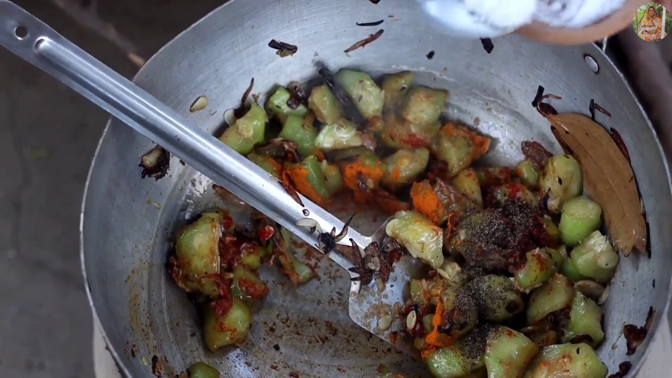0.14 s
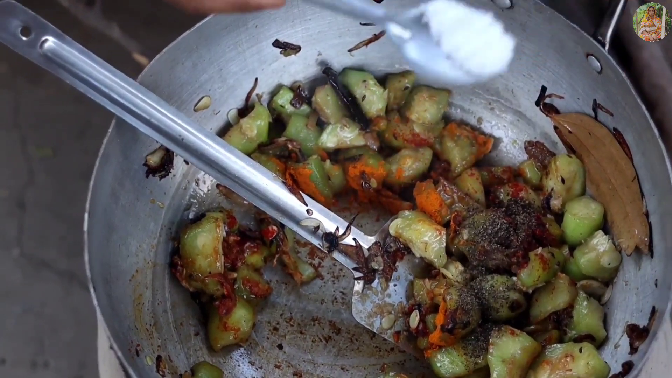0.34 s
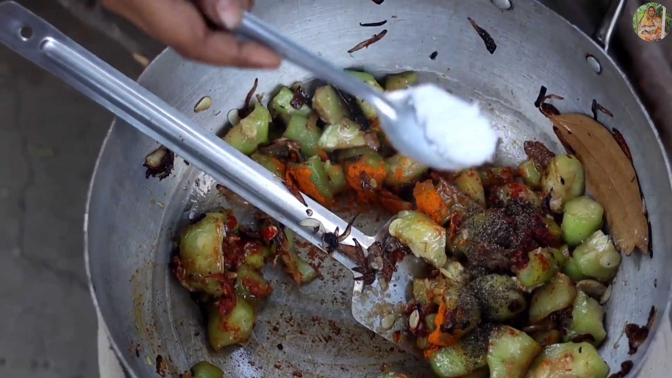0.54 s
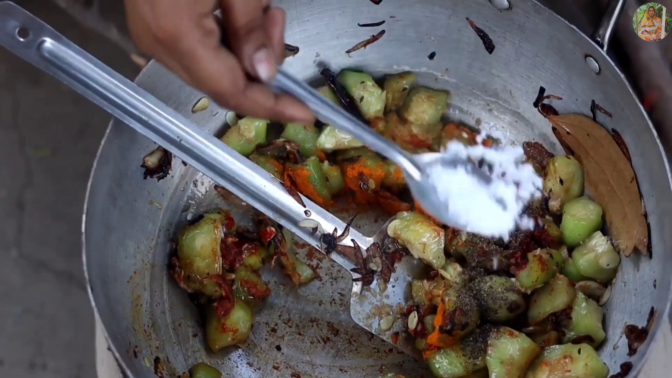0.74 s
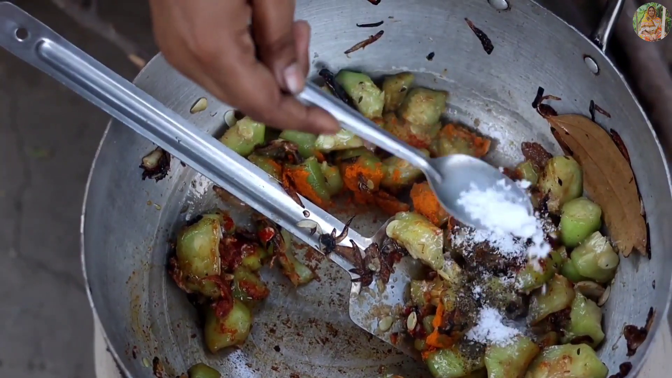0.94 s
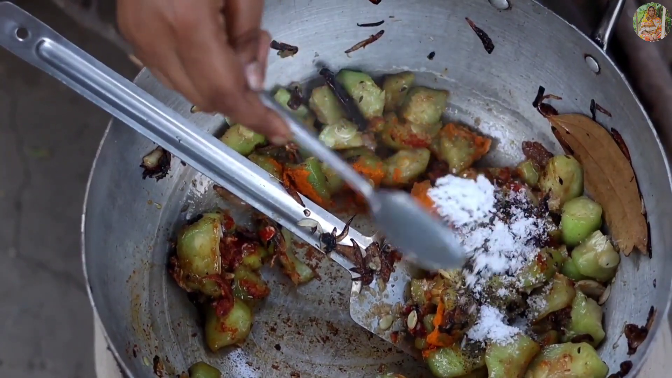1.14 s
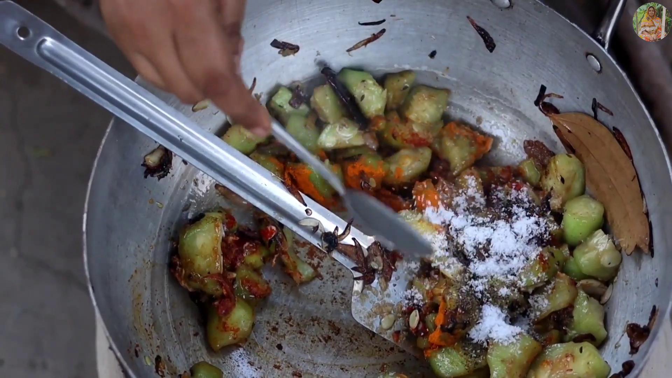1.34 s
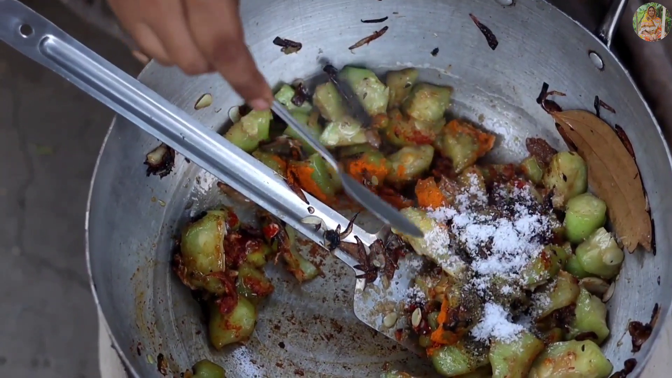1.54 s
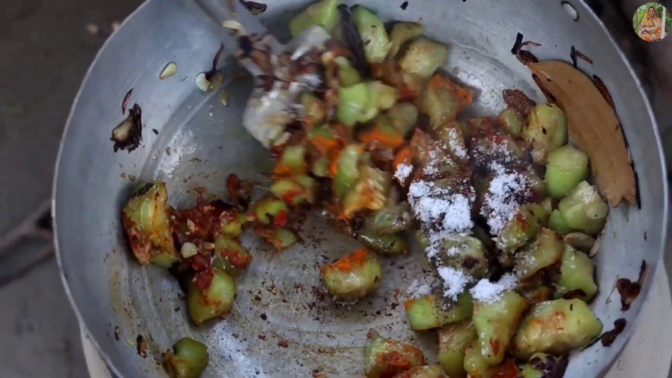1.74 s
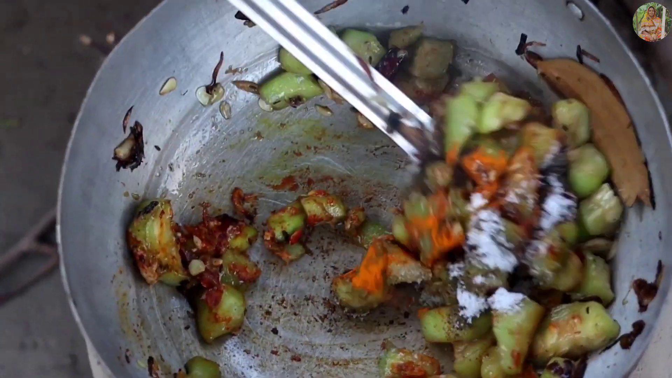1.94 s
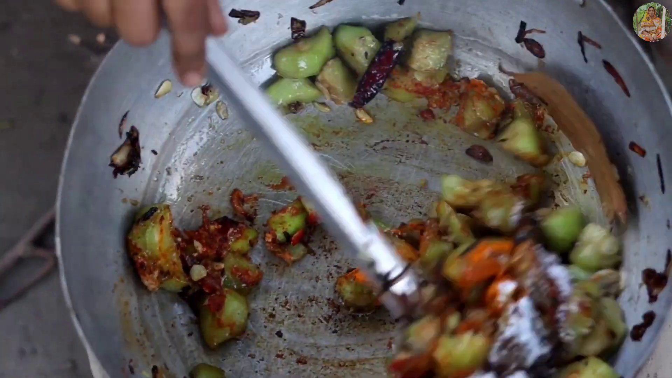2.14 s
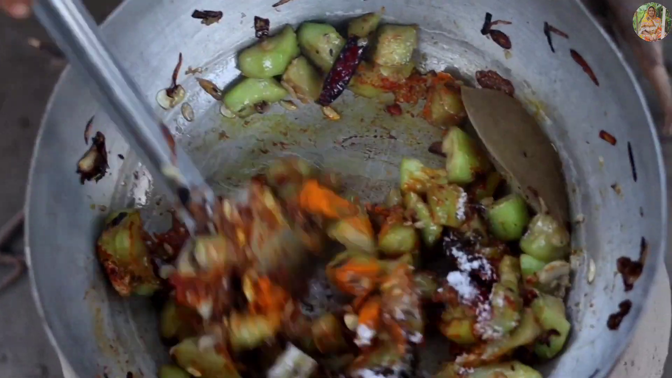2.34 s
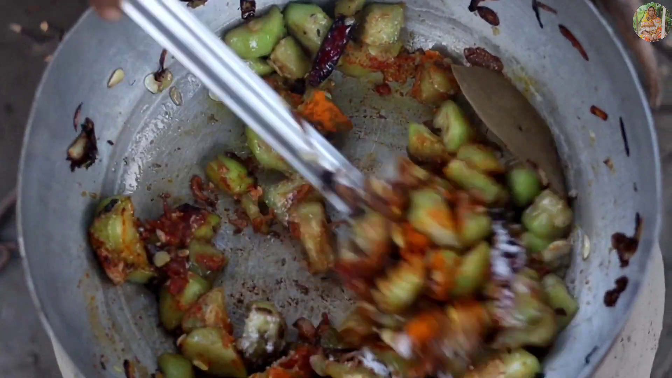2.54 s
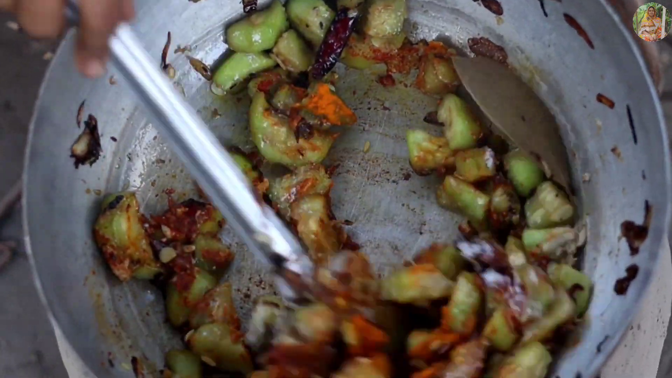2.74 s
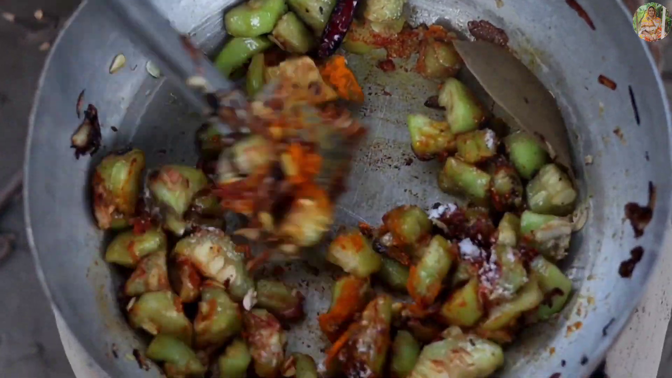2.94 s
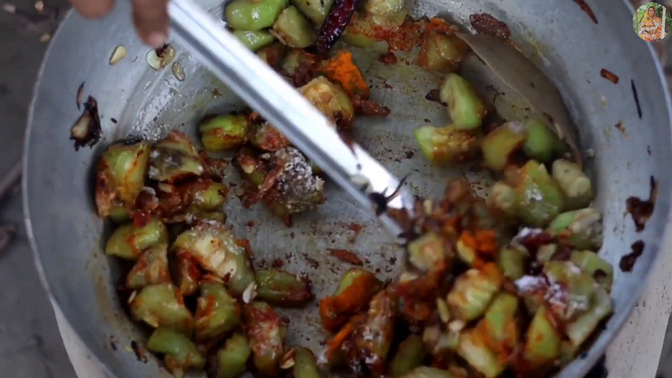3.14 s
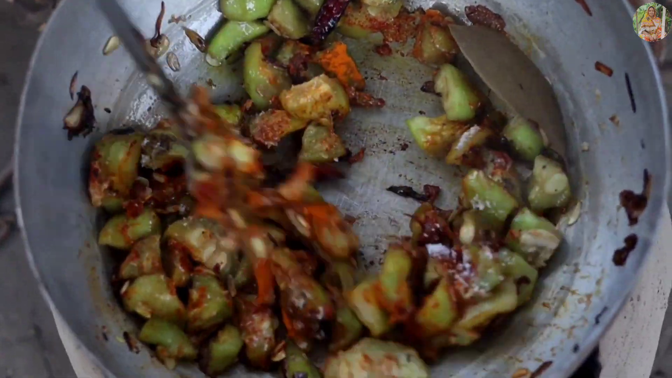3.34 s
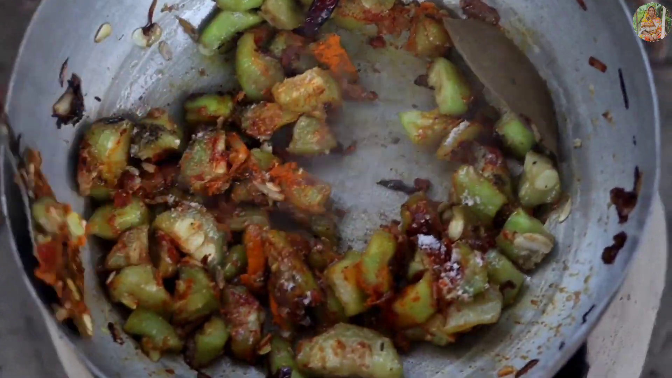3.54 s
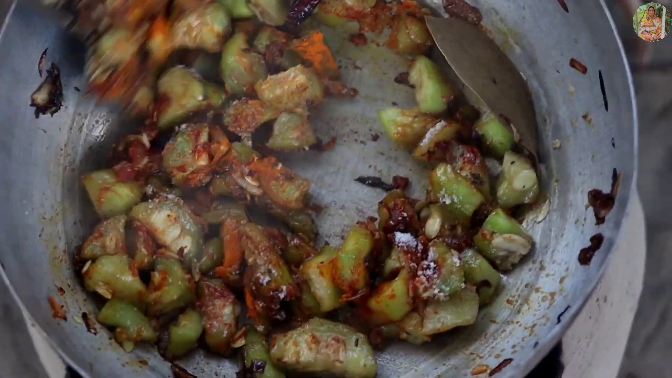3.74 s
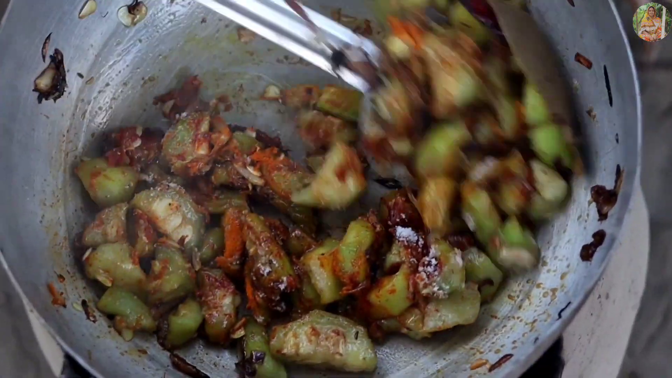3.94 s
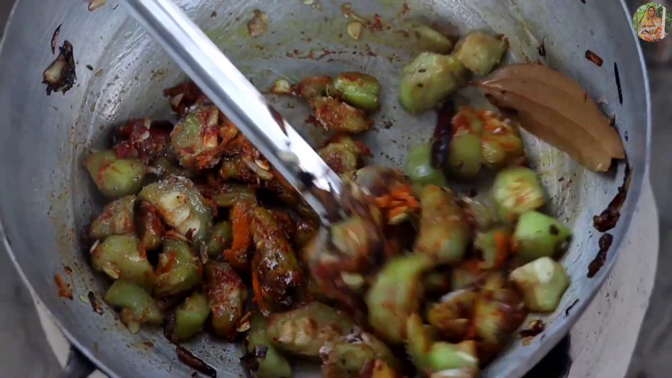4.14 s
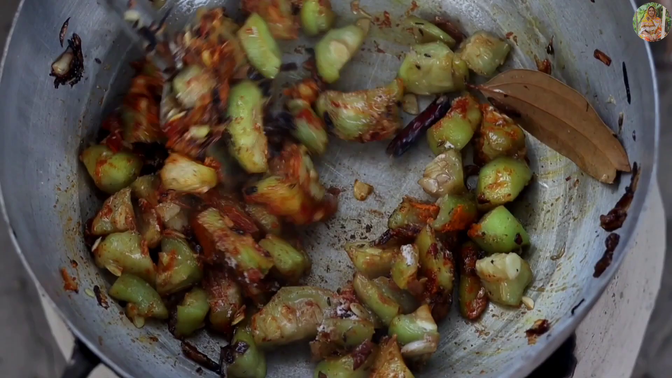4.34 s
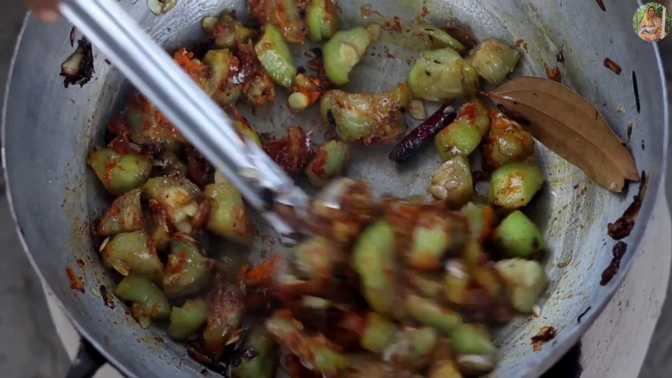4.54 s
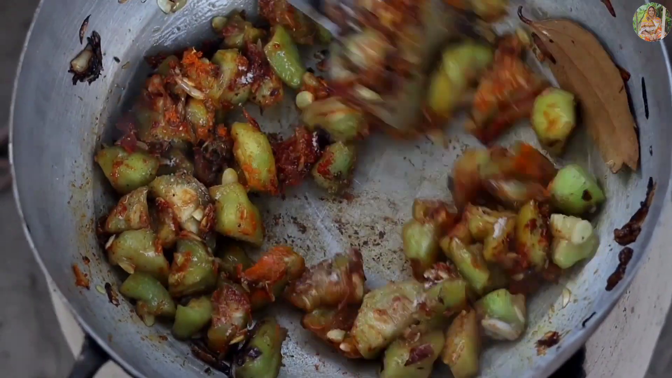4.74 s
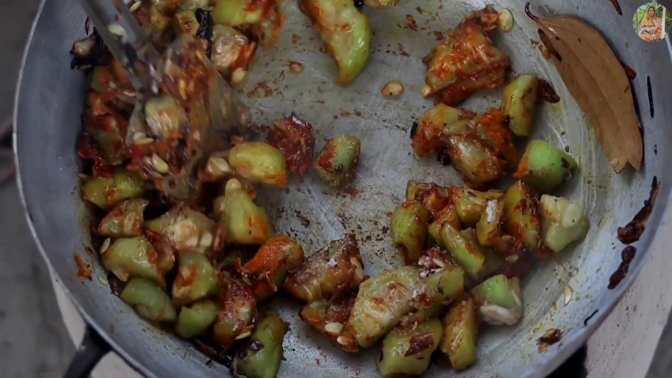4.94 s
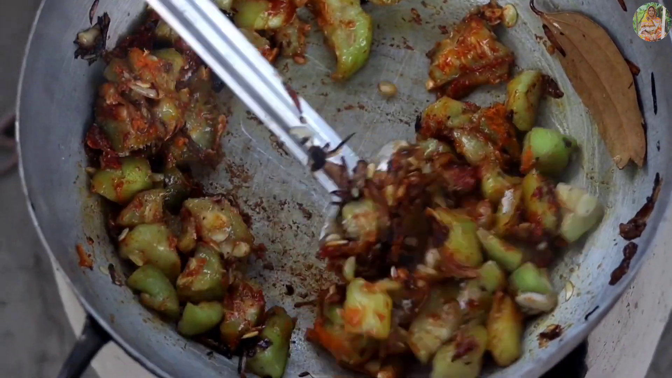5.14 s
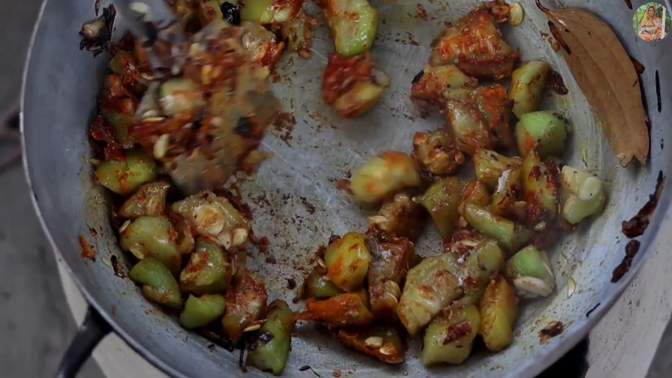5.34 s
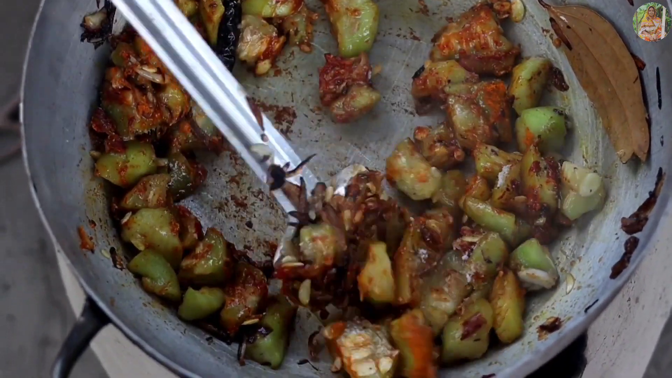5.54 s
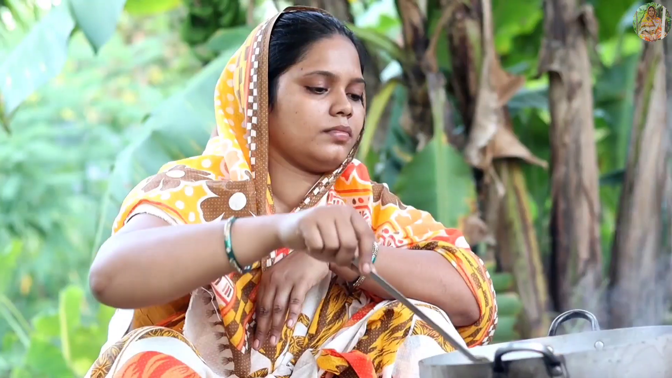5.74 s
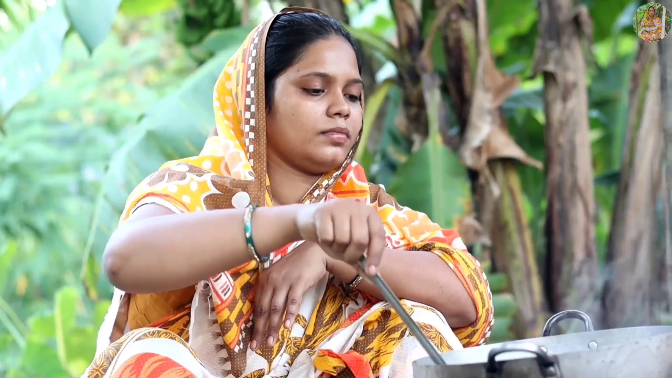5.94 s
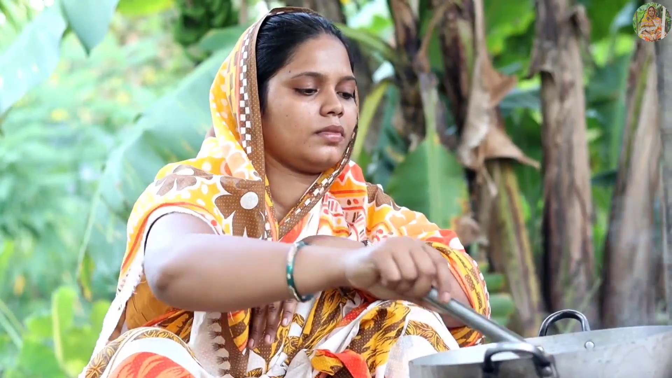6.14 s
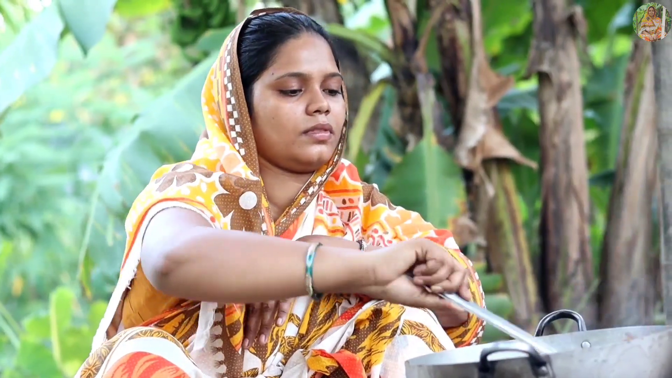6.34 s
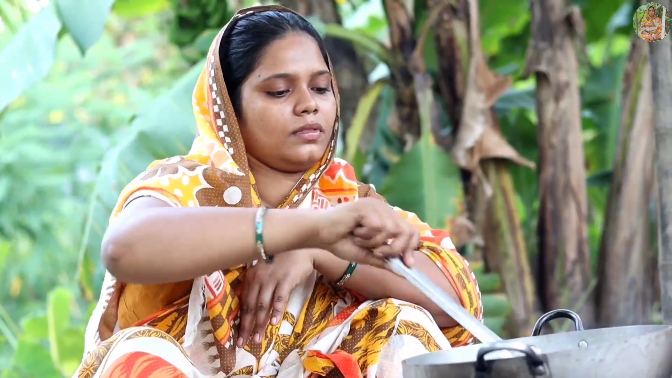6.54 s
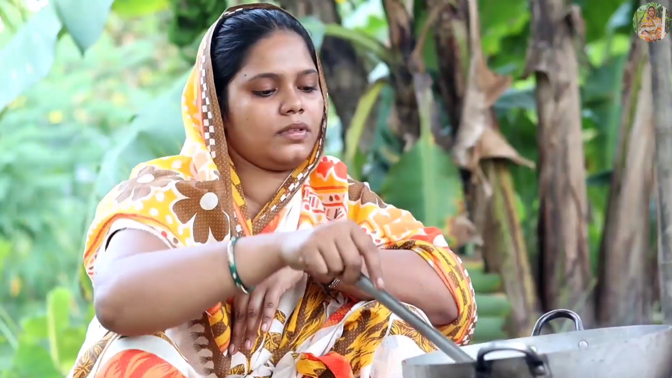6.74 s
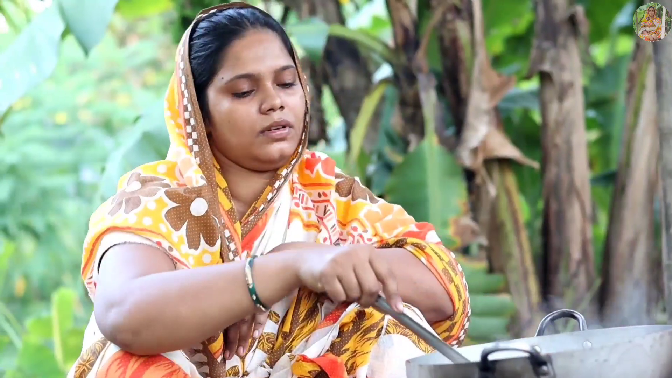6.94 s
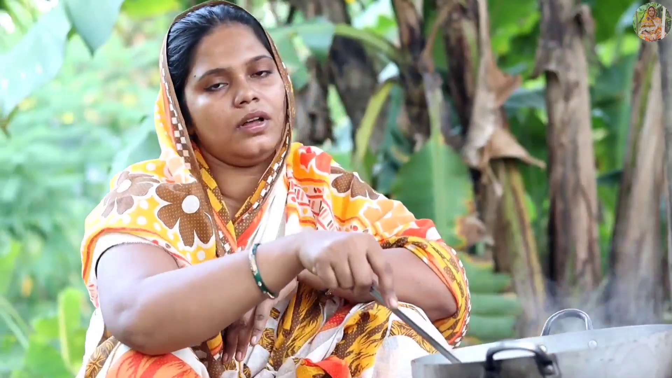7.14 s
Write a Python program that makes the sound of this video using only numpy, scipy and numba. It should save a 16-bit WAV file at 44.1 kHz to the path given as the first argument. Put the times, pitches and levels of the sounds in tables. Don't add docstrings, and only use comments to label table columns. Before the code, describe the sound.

Close to a wide metal pan outdoors, vegetables fry with an even, bright, crackling sizzle over a faint low engine drone. Before two seconds the hiss jumps louder and surges with each turn of a spatula, with dull knocks and one sharp scrape. Near the end the sound abruptly becomes distant: faint sizzle, no engine, and prominent metallic knocks and scrapes.

```python
import sys
import numpy as np
from scipy import signal
from scipy.fft import rfft, irfft, next_fast_len
from scipy.io import wavfile
from scipy.ndimage import uniform_filter1d
from numba import njit

SR = 44100
rng = np.random.default_rng(int(sys.argv[2]) if len(sys.argv) > 2 else 0)


def output_pcm(signal):
    pcm = np.clip(np.atleast_2d(signal).T, -1, 1) * 32767
    wavfile.write(sys.argv[1], SR, np.round(pcm).astype(np.int16))


def volts_from_db(level):
    exponent = np.asarray(level, float) / 20
    return 10 ** exponent


N = 316880

# (frequency [Hz], density [dB per Hz])
REST_SPECTRUM = [(120, -63), (200, -30), (471, -18), (618, -18.5), (974, -15.5), (1150, -10.5),
                 (1400, -10.5), (1590, -3.5), (1840, -12.5), (2210, -6), (4030, -10), (8350, -2.5),
                 (10600, -6), (13400, 4), (15500, 0)]
STIRRED_SPECTRUM = [(120, -50.5), (200, -26), (288, -21), (446, -8), (535, -13), (1190, -8.5), (1630, -5.5),
                    (1920, -13), (2760, -8), (4680, -3), (6620, -5), (8390, 4), (10600, -5.5), (13500, 2.5),
                    (15600, -7)]
DISTANT_SPECTRUM = [(120, -9), (200, -10.5), (463, -9.5), (691, -20), (799, -24), (860, -11), (942, -13),
                    (1070, -6.5), (1190, -17), (1430, -9), (1750, -10.5), (8870, 2), (15600, -14)]
# (frequency [Hz], width [Hz], gain [dB])
REST_BOWL = [(600, 900, 4.4), (440, 80, 2.5), (2100, 330, 1.4)]
STIRRED_BOWL = [(470, 37, -0.5), (1052, 28, 4), (1680, 120, 2.5), (1930, 98, 1), (2250, 290, 4),
                (2800, 780, 3.5)]
DISTANT_BOWL = [(447, 80, 4.7), (1040, 40, 4), (1420, 110, 6)]
# (low edge [Hz], high edge [Hz])
BUBBLE_BANDS = [(6500, 10500), (3000, 6500), (10500, 20000), (110, 1800), (1800, 3000)]
HZ = np.fft.rfftfreq(next_fast_len(N), 1 / SR)
BAND_SHARES = [1 / (1 + (lo / (HZ + 1)) ** 12) - 1 / (1 + (hi / (HZ + 1)) ** 12) for lo, hi in BUBBLE_BANDS]

# (loudest moment [s], swell [dB], length [s], wetness [dB])
TURNS = [(1.932, 3, 0.18, -1), (2.15, 0.5, 0.055, -3.5), (2.462, 5.5, 0.3, 1.5), (2.74, .5, 0.076, -2),
         (2.9, 1.5, .06, 1), (3.066, 5, 0.15, 0.5), (3.37, 2, 0.11, 0.5), (3.56, 5.5, 0.17, -0.5),
         (3.95, 3.5, .2, 0.5), (4.25, 1.5, 0.089, 1), (4.425, 6.5, 0.15, 0), (4.63, 6, 0.12, -1.5),
         (4.879, 6, 0.14, -1), (5.05, 4, 0.087, -0.5), (5.143, 2.5, 0.054, 1.5), (5.42, 3, 0.22, 0),
         (5.698, 2.5, 0.32, -0.5)]
# (level over spray [dB], slope with swell [dB/dB], slope with wetness [dB/dB])
STIRRED_MIX = [(-1.5, -0.06, 0.96), (-3.5, -.5, 0.4), (-10.5, -0.3541, 0.17), (-9.5, -0.09, 1.8)]
# (level over spray [dB], slope with growth [dB/dB])
RESTING_MIX = [(-1.5, -0.54), (-8.5, .1), (-10.5, -.5), (-9.5, -.5)]
# (level over spray [dB], slope with change [dB/dB])
DISTANT_MIX = [(0, 0.1), (-9.5, -1.1), (-6, -.6), (-7.5, -.5)]
STIRRED_DB, CUT_S, CUT_DB_PER_S = -30, 5.85, -400
RESTING_DB, SALT_S, SALT_DB_PER_S = -36.5, 0.75, 2.8
DISTANT_DB, WAKE_S, WAKE_DB, COOL_S, COOL_DB_PER_S = -44, 6.08, -19, 6.57, -4.5

# (frequency [Hz], level [dB], t60 [s])
LOW_MODES = [(253, -20.5, 0.16), (352, -21.5, 0.062), (395, -17, .04), (442, 6.5, 0.055),
             (512, -0.5, 0.072), (570, -3, 0.042), (670, -15, 0.079)]
MID_MODES = [(745, -5.5, 0.051), (873, -7, 0.094), (1026, -13, 0.2), (1053, -1, 0.055), (1330, -13, 0.25),
             (1500, -0.5, 0.062), (1597, -4.5, 0.049), (1774, -5.5, .08), (1956, -1, 0.065),
             (2224, -9, 0.04), (2530, -8, 0.06), (2830, -3, .04)]
# (frequency [Hz], level [dB], t60 [ms])
EDGE_MODES = [(3080, -14, 7), (4800, -4.5, 4.8), (5800, 1, 4.8), (7520, 4.5, 3.4), (9000, 3.5, 2.3),
              (12900, -6, 1.4)]
# (time [s], low peak [dB], middle over low [dB], rubbing time [s], middle pitch [Hz])
KNOCKS = [(1.95, -42, 13, 0.013, 1500), (2.698, -32, 2, 0.011, 1060), (3.204, -33, 6, .012, 1050),
          (3.633, -28, -22, .008, 556), (3.978, -40, 8, .012, 1110), (4.064, -33, -2, 0.015, 800),
          (4.486, -42, -1, .012, 1268), (4.893, -36.5, 11, 0.021, 795), (5.043, -28, 3, .03, 780),
          (5.06, -40, 11, 0.033, 1330), (5.08, -37.5, 18, 0.012, 1790), (5.999, -35.5, -7, 0.013, 2300),
          (6.058, -38.5, -11, .009, 1500), (6.218, -32, -3, 0.038, 1850), (6.314, -32.5, -8, 0.034, 800),
          (6.365, -16, -1.5, 0.011, 1500), (6.38, -22, -0.5, 0.027, 1030), (6.385, -29.5, 7, .029, 1550),
          (6.435, -34.5, -10, .012, 1900), (6.51, -43, -1, 0.023, 1450), (6.925, -21.5, -11.5, .0025, 1450),
          (6.94, -36.5, -10, 0.027, 700), (7.06, -46, -6, .019, 650)]
# (time [s], rasp peak [dB], middle over rasp [dB], rubbing time [s], middle pitch [Hz])
SCRAPES = [(5.126, -16.5, -6, 0.012, 1480), (5.145, -18, -22, 0.017, 2500),
           (5.988, -22.5, -20, 0.0095, 2230), (6.0, -20.5, -18, 0.013, 2300),
           (6.125, -27, -15, 0.011, 2000), (6.129, -31, -11, 0.11, 1500), (6.19, -33, 1, 0.016, 2050),
           (6.2, -18.5, -15, 0.017, 2050), (6.21, -24, -11, 0.053, 1010), (6.39, -28, -12, 0.084, 1330),
           (6.456, -30.5, -6, 0.026, 1330), (6.514, -37, -5, 0.036, 1450)]
KNOCK_EDGE_DB, EDGE_DB_PER_OCTAVE = -7, 8.5
SCRAPE_LOW_DB, RASP_OVER_PITCH, RASP_DB_PER_OCTAVE, BODY_DB_PER_OCTAVE = -22, 2.8, 1, 24.5
# (time [s], length [s], level [dB], start pitch [Hz], end
# pitch [Hz])
SQUEALS = [(5.125, .03, -28, 4800, 4750), (5.99, 0.038, -39, 4800, 4700), (5.989, .03, -46, 2300, 2250),
           (6.09, .13, -48, 4450, 4350), (6.125, .15, -51, 1050, 1000), (6.195, .1, -42, 2080, 1760),
           (6.2, .045, -44, 3080, 3000), (6.41, 0.16, -43, 1360, 1320), (6.41, 0.19, -44, 1048, 1040),
           (7.05, 0.037, -46, 880, 860), (6.215, .09, -42, 500, 520), (6.3, .06, -42, 480, 470)]
SQUEAL_WIDTH_HZ = 40

# (multiple [1], level [dB])
ENGINE_MULTIPLES = [(2, -60.5), (3, -58.5), (4, -61.5), (5, -74), (6, -71), (8, -73)]
# (time [s], cycle rate [Hz], load [dB], tilt [dB added to multiples above the
IDLING = [
    (0, 24.5, -13, 3),
    (.66, 26.6, -7.5, -1),
    (.9, 25.23, -10.5, -2),
    (1.3, 27.9, -9, 2.5),
    (1.7, 27.05, -14, 1.5),
]
PULLING = [
    (1.8, 24.33, -5.5, 7),
    (2.97, 25.6, -2.5, 4),
    (3.5, 26.1, -1, 4),
    (3.75, 26.6, 1, 1.5),
    (4.3, 27.7, 1, .5),
    (4.6, 29, 0.5, -1),
    (4.84, 30.1, 0, -2),
    (5.21, 29.46, -1, -5),
    (5.57, 27.04, 0, 0),
    (5.88, 29.9, 0, -1.5),
]
# (frequency [Hz], level [dB])
AIR_SPECTRUM = [(15, -30), (25, -8), (45, -10), (90, -0.5), (140, -2), (220, -9), (350, -6), (600, -6.5),
                (1000, -12.5), (1600, -31)]
RUMBLE_DB, RUMBLE_FOLLOWS, DISTANT_RUMBLE_DB = -51, 0.88, -56.5
TOP_HZ = 15520


def level(x, db):
    return x * volts_from_db(db) / np.sqrt(np.mean(x ** 2))


def fade(t0, t1):
    return np.clip((np.arange(N) / SR - t0) / (t1 - t0), 0, 1)


def walk(rate):
    k = int(SR / rate)
    held = np.repeat(rng.standard_normal(N // k + 1), k)[:N]
    return 0.76 * uniform_filter1d(uniform_filter1d(held, k), k)


def colour(points, peaks=()):
    log_hz, points_db = np.log(np.array(points)[:, 0]), np.array(points)[:, 1]
    db = np.interp(np.log(HZ + 1), log_hz, points_db)
    db = db + sum(gain / (1 + (2 * (HZ - hz) / width) ** 2) for hz, width, gain in peaks)
    cepstrum = irfft(db * np.log(10) / 20)
    half = len(cepstrum) // 2
    cepstrum[1:half] *= 2
    cepstrum[half + 1:] = 0
    return np.exp(rfft(cepstrum))


def sizes(u, spread_db):
    return volts_from_db(spread_db * np.minimum(-np.log(1 - u), 4.5))


@njit
def grains(start, hz, cycles, size, glide, n):
    y = np.zeros(n + 2000)
    for k in range(len(start)):
        w = 2 * np.pi * hz[k] / SR
        z, step = size[k] + 0j, np.exp(1j * w - hz[k] / SR / cycles[k])
        rise = np.exp(1j * w * glide * hz[k] / SR)
        for i in range(min(int(5 * cycles[k] * SR / hz[k]), 2000)):
            y[start[k] + i] += z.imag
            z *= step
            step *= rise
    return y[:n]


def steam():
    hiss = rng.standard_normal(N) * volts_from_db(0.84 * walk(160))
    chance, polarity, size = rng.random(size=(3, N))
    pops = (chance < 900 / SR) * np.sign(polarity - 0.5) * sizes(size, 2.6)
    when, pitch, size, damping = rng.random((30000, 4)).T
    hz = 600 + 15000 * pitch
    start = (when * N).astype(np.int64)
    bubbles = grains(start, hz, 2.8 * (0.5 + damping), sizes(size, 2.5) * np.sqrt(hz), 0.019, N)
    return hiss, level(pops, 0), level(bubbles, 0)


def stirred():
    t, swell, wet = np.arange(N) / SR, 0, 0
    for s, db, length, wet_db in TURNS:
        bump = np.exp(-((t - s) / length) ** 2)
        swell, wet = swell + db * bump, wet + wet_db * bump
    spray_db = STIRRED_DB + swell + CUT_DB_PER_S * np.clip(t - CUT_S, 0, 0.08)
    return [spray_db] + [db + a * swell + b * wet for db, a, b in STIRRED_MIX]


def resting():
    growth = SALT_DB_PER_S * np.clip(np.arange(N) / SR - SALT_S, 0, 1.1)
    return [RESTING_DB + growth] + [db + a * growth for db, a in RESTING_MIX]


def distant():
    cooling = COOL_DB_PER_S * np.maximum(np.arange(N) / SR - COOL_S, 0)
    change = WAKE_DB * (1 - fade(5.63, WAKE_S)) + cooling
    return [DISTANT_DB + change] + [db + a * change for db, a in DISTANT_MIX]


def sizzle(kinds, columns, response, pop_db, bubble_db, flicker_db):
    hiss, pops, bubbles = kinds
    raw = hiss + volts_from_db(pop_db) * pops + volts_from_db(bubble_db) * bubbles
    spectrum = rfft(raw, 2 * len(HZ) - 2) * response
    spray_db, *over = columns
    spray_db = spray_db - 0.9 + 1.14 * flicker_db * walk(35)
    out = 0
    for share, db in zip(BAND_SHARES, [0] + over):
        band = irfft(spectrum * share)[:N]
        out = out + level(band, spray_db + db + flicker_db * walk(13))
    return out


def bank(modes, t):
    hz, db, t60 = np.transpose(modes)[:, :, None]
    sign = (-1.) ** np.arange(len(hz))[:, None]
    return sign * volts_from_db(db) * np.sin(2 * np.pi * hz * t) * np.exp(-np.log(1000) * t / t60)


def ring(force, modes, tilt_db, peak_db):
    y = signal.fftconvolve(force, volts_from_db(tilt_db) @ modes)[:len(force)]
    return y * volts_from_db(peak_db) / np.abs(y).max()


def spatula():
    out, t = np.zeros(N + SR), np.arange(int(0.4 * SR)) / SR
    low, mid = bank(LOW_MODES, t), bank(MID_MODES, t)
    rasp = bank(np.array(EDGE_MODES) / [1, 1, 1000], t)
    low_hz, mid_mode_hz, edge_hz = [np.array(m)[:, 0] for m in (LOW_MODES, MID_MODES, EDGE_MODES)]
    contacts = []
    for s, db, over, rub, hz in KNOCKS:
        top_db = db + KNOCK_EDGE_DB + EDGE_DB_PER_OCTAVE * np.log2(hz / 1000)
        contacts.append((s, db, db + over, top_db, rub, hz))
    for s, db, over, rub, hz in SCRAPES:
        contacts.append((s, db + SCRAPE_LOW_DB, db + over, db, rub, hz))
    for s, low_db, mid_db, top_db, rub, mid_hz in contacts:
        grit = rng.standard_normal((2, len(t)))
        chance = 1.5 * rng.standard_normal(size=(2, 7))
        contact = np.minimum(t / (0.00064 + 0.062 * rub), 1) / (1 + (t / rub) ** 6)
        blow = np.exp(-t / 0.00017) * 2.9 * np.exp(-rub / 0.011)
        force = blow + contact * grit[0] * (0.48 + np.abs(grit[1]))
        near_db = -14 * np.abs(np.log2(mid_mode_hz / mid_hz))
        body_db = BODY_DB_PER_OCTAVE * np.log2(low_hz / 450) * min(np.log2(mid_hz / 1000), 0)
        edge_db = RASP_DB_PER_OCTAVE * np.abs(np.log2(edge_hz / mid_hz / RASP_OVER_PITCH))
        sound = ring(force, low, chance[0] + body_db, low_db)
        sound += ring(force, mid, near_db, mid_db)
        sound += ring(force, rasp, chance[1, :len(edge_hz)] + edge_db, top_db)
        out[int(s * SR):][:len(t)] += sound
    return signal.sosfilt(signal.butter(4, 230, "highpass", fs=SR, output="sos"), out[:N])


def squeals():
    out = np.zeros(N + SR)
    for s, length, db, start_hz, end_hz in SQUEALS:
        u = np.arange(int(length * SR)) / (length * SR)
        noise = rng.standard_normal(size=(2, SR // 4))
        waver = uniform_filter1d(noise, int(SR / SQUEAL_WIDTH_HZ))[:, :len(u)]
        phase = 2 * np.pi * np.cumsum(start_hz + (end_hz - start_hz) * u) / SR
        tone = level(waver[0] * np.sin(phase) + waver[1] * np.cos(phase), db)
        out[int(s * SR):][:len(u)] += tone * np.minimum(8 * u, 1) * (1 - u)
    return out[:N]


def curve(table):
    s, *columns = np.transpose(table)
    return [np.interp(np.arange(N) / SR, s, c) for c in columns]


def outdoors():
    noise = rng.standard_normal(N)
    rumble = irfft(rfft(noise, 2 * len(HZ) - 2) * colour(AIR_SPECTRUM))[:N]
    hz, load_db, tilt_db = curve(list(IDLING) + list(PULLING))
    phase = 2 * np.pi * np.cumsum(hz * (1 + 0.002 * walk(8))) / SR
    engine = 0
    for k, db in ENGINE_MULTIPLES:
        tone_db = db + load_db + tilt_db * np.clip(k - 3, -1, 1) + 1.1 * walk(4.52)
        engine = engine + np.sqrt(2) * volts_from_db(tone_db) * np.sin(k * phase)
    gone = fade(5.86, 5.92)
    rumble_db = (RUMBLE_DB + RUMBLE_FOLLOWS * load_db) * (1 - gone) + DISTANT_RUMBLE_DB * gone
    return level(rumble, rumble_db) + engine * (1 - gone)


def scene():
    kinds = steam()
    rest = sizzle(kinds, resting(), colour(REST_SPECTRUM, REST_BOWL), -2.5, -4.0, 0.45)
    rest = rest * (1 - fade(1.75, 1.79))
    near = sizzle(kinds, stirred(), colour(STIRRED_SPECTRUM, STIRRED_BOWL), -12.5, -6.0, 0.72)
    near = near * fade(1.746, 1.813) * (1 - fade(5.9, 5.94))
    far = sizzle(kinds, distant(), colour(DISTANT_SPECTRUM, DISTANT_BOWL), -6.0, -8.0, 1.6)
    far = volts_from_db(-1.5) * far * fade(5.86, 5.91)
    return np.tile(rest + near + far + outdoors() + spatula() + squeals(), (2, 1))


def top_cut(x):
    return signal.sosfilt(signal.butter(12, 16150, fs=SR, output="sos"), x)


def record(dry):
    low_pass = signal.ellip(12, 0.3, 80, TOP_HZ, fs=SR, output="sos")
    mix = signal.sosfilt(low_pass, dry)
    return top_cut(mix)


dry = scene()
out = record(dry)
output_pcm(out)
```